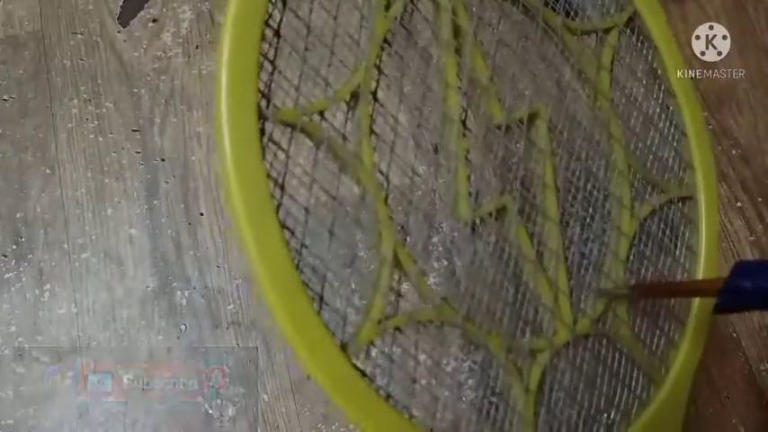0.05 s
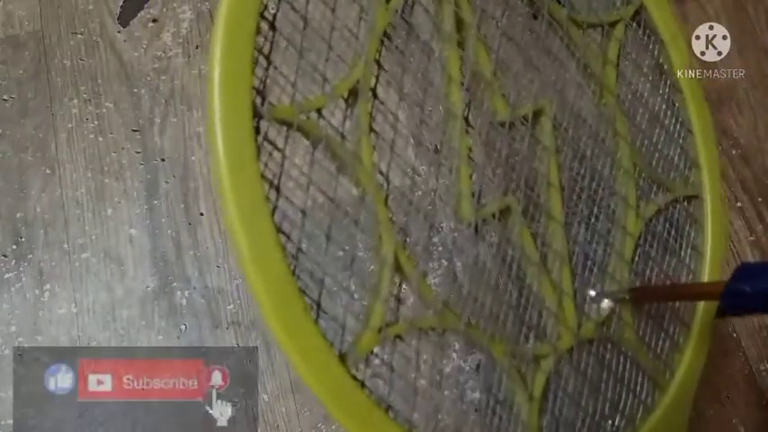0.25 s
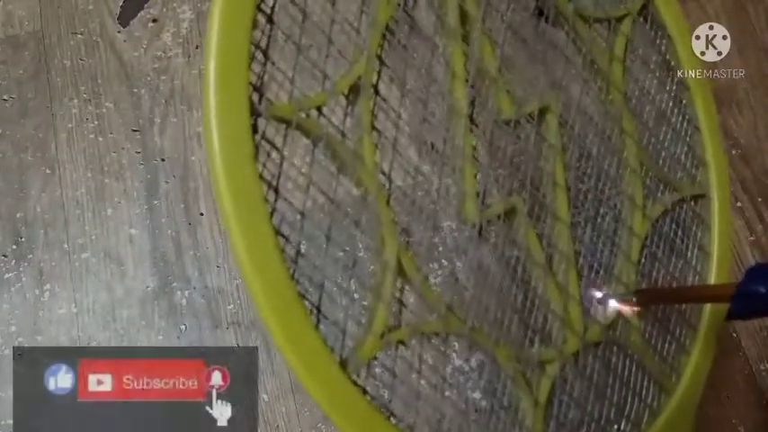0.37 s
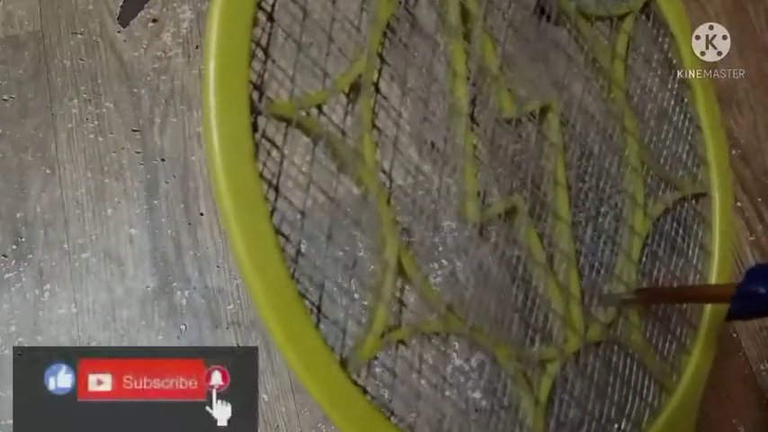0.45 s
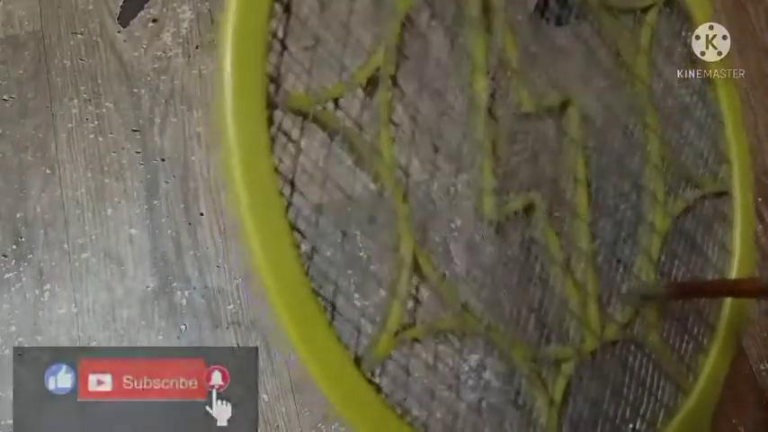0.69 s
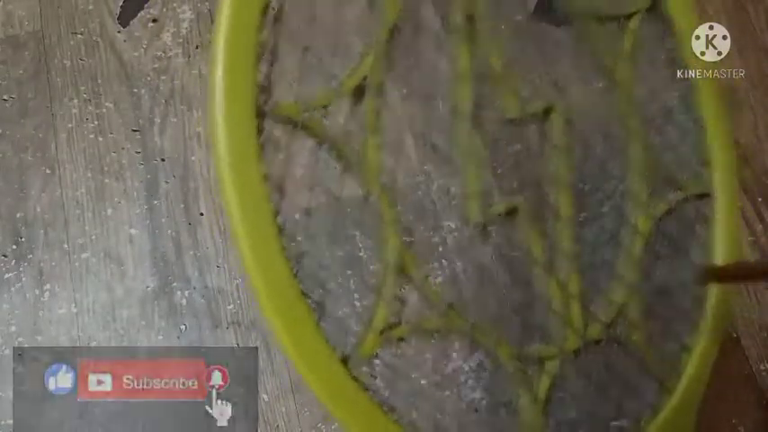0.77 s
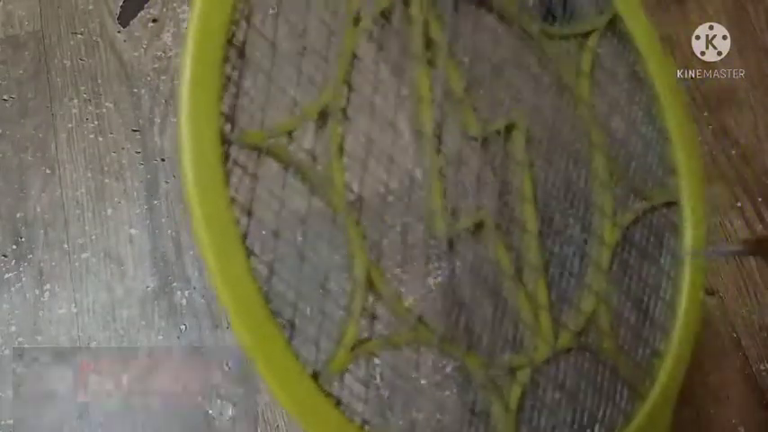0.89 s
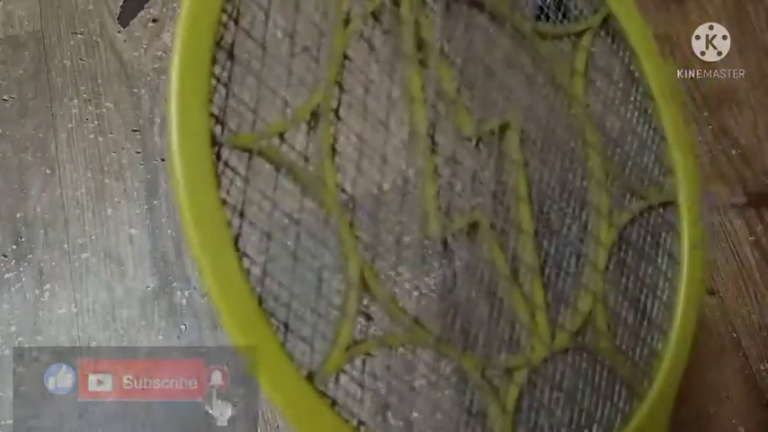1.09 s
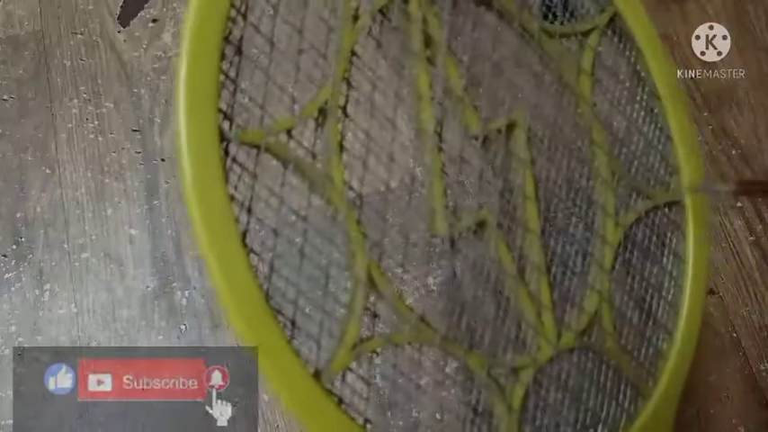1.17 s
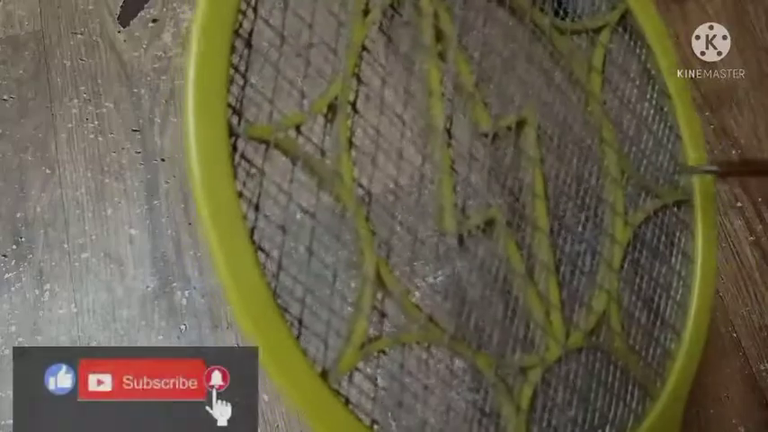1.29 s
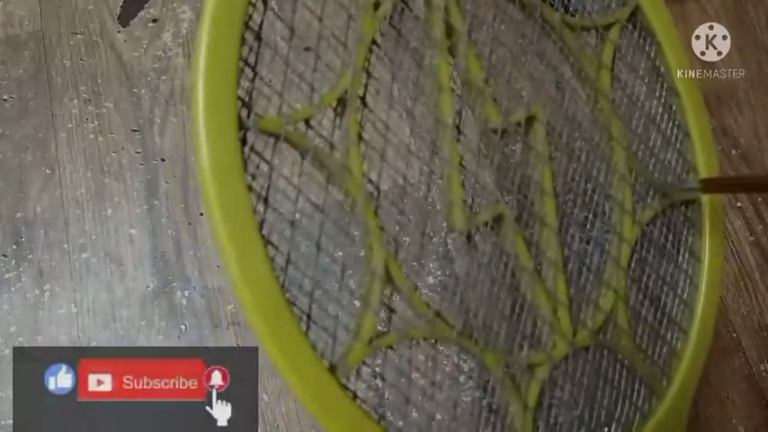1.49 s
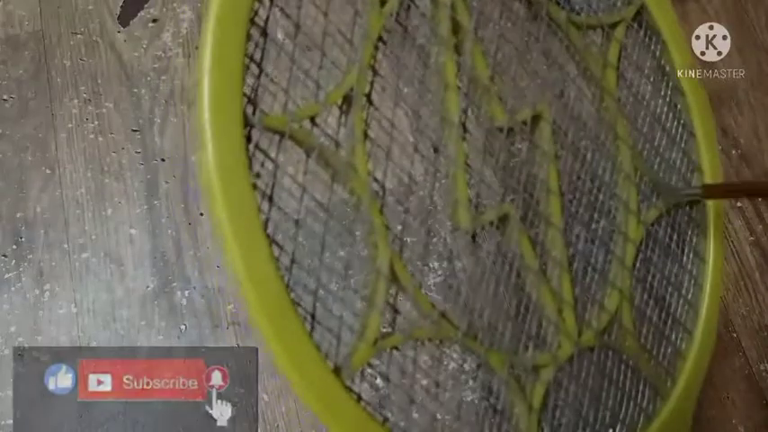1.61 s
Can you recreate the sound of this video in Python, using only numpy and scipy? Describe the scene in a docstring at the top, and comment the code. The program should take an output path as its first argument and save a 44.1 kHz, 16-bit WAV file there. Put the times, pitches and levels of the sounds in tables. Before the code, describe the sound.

A quick burst of sharp electric snaps from a fly swatter, then faint handling.

```python
"""Shorting an electric fly swatter

A table in a small room, a phone microphone close by, a faint low rumble underneath.
A metal tool scratches over the swatter's charged mesh and shorts it: a quick run of sparks snaps,
slowest where they are strongest. The tool is dragged off the wires, and the plastic frame
rattles and shifts once more on the table."""
import sys
import numpy as np
from scipy import signal
from scipy.fft import rfft, irfft
from scipy.io import wavfile

SR = 44100
rng = np.random.default_rng(int(sys.argv[2]) if len(sys.argv) > 2 else 0)


def generate_wav(signal):
    """Clip the signal to [-1, 1] and save it as 16-bit WAV at the path in sys.argv[1]."""
    frames = np.transpose(np.atleast_2d(signal))
    scaled = np.clip(frames, -1, 1) * 32767
    pcm = np.round(scaled).astype(np.int16)
    wavfile.write(sys.argv[1], SR, pcm)


N = 72765
TIME = np.arange(N) / SR
LN_1000 = np.log(1000)  # a 60 dB decay

def undb(db):
    return 10 ** (np.asarray(db) / 20)

def unit_rms(x):
    return x / np.sqrt(np.mean(x ** 2))

def convolve(x, response):
    return signal.fftconvolve(x, response)[:N]

def impulses(table):
    """One impulse for each (s, dB) row."""
    return sum(undb(db) * signal.unit_impulse(N, int(start * SR)) for start, db in table)

def envelope(start, length, attack, release):
    """Linear attack, hold, exponential release."""
    age = TIME - start
    return np.clip(age / attack, 0, 1) * np.exp(-np.maximum(age - length, 0) / release)

def colour(x, points, size=4096):
    """Minimum-phase filter through (Hz, dB) points."""
    hz, db = np.array(points).T
    bins_hz = np.maximum(np.fft.rfftfreq(size, 1 / SR), 1)
    gain = undb(np.interp(np.log(bins_hz), np.log(hz), db))
    cepstrum = irfft(np.log(gain))
    cepstrum[1:size // 2] *= 2
    cepstrum[size // 2 + 1:] = 0
    return convolve(x, irfft(np.exp(rfft(cepstrum))))

def damped_sine(hz, width_hz):
    return np.exp(-np.pi * width_hz * TIME) * np.sin(2 * np.pi * hz * TIME)

def resonate(x, modes):
    """Sum of resonances (Hz, width Hz, dB) with alternating signs."""
    response = sum((-1) ** k * undb(db) * width * damped_sine(hz, width)
                   for k, (hz, width, db) in enumerate(modes))
    return convolve(x, response)

def friction(contacts, modes, surface, release_s, slips_per_s=3000):
    """Uneven stick-slip clicks ring a body; each contact adds its own share of surface grit."""
    slips = (rng.random(N) < slips_per_s / SR) * rng.choice([-1, 1], N)
    slips = slips * (.5 + rng.random(N))
    push = np.array([undb(db) * envelope(start, length, attack, release_s)
                     for start, length, db, _, attack in contacts])
    grit_share = undb(np.array(contacts)[:, 3:4])
    body = np.linalg.norm(push, axis=0) * unit_rms(resonate(slips, modes))
    grit = np.linalg.norm(push * grit_share, axis=0) * unit_rms(colour(slips, surface))
    return body, grit

def room(x, t60_s=0.22, treble_t60_s=0.16, build_s=0.012, split_hz=5000):
    """Diffuse tail of a small room; the treble dies sooner."""
    tail = np.zeros(N)
    for band, t60 in (("low", t60_s), ("high", treble_t60_s)):
        crossover = signal.butter(2, split_hz, band, fs=SR, output="sos")
        tail += signal.sosfilt(crossover, rng.standard_normal(N)) * np.exp(-LN_1000 * TIME / t60)
    tail *= 1 - np.exp(-TIME / build_s)
    return convolve(x, tail / np.linalg.norm(tail))

# Room tone at the microphone. Each row: frequency in Hz, relative level in dB.
HISS_COLOUR = [(15, -55.5), (25, -25), (43, -27), (77, -8.5), (122, 0.5), (188, -10), (289, -11.5),
               (389, -14), (523, -15), (1020, -21.5), (1380, -18), (2490, -21.5), (3630, -24.5),
               (5880, -44.5), (9050, -35), (10900, -47.5), (15500, -44)]

def room_tone(hiss_db=-66.5, rumble_db=-79.5, rumble_hz=128, rumble_width_hz=47):
    """Faint hiss and a wavering low rumble."""
    hiss = colour(rng.standard_normal(N), HISS_COLOUR)
    rumble = resonate(rng.standard_normal(N), [(rumble_hz, rumble_width_hz, 0)])
    return undb(hiss_db) * unit_rms(hiss) + undb(rumble_db) * unit_rms(rumble)

# Strokes of the tool, close up. Each row: start and length in seconds, relative level in dB,
# grit share in dB, attack in seconds.
TOOL_STROKES = [(-.02, 0.031, -54, -5.5, 0.0045), (.024, 0.0042, -43.5, -6, 0.004),
                (.04, 0.052, -55, 1.5, 0.012), (.086, 0.0089, -48, -5, 0.0038),
                (.127, 0.021, -53.5, -1.5, 0.0035), (.328, 0.0077, -54, -16, 0.0016),
                (.453, 0.014, -48, 3, 0.0031), (.462, 0.042, -52.5, 0.5, 0.011),
                (.546, .028, -51.5, 3, 0.02), (.574, 0.038, -42.5, 3.5, 0.0029),
                (.616, 0.0074, -45, 6, 0.0018), (.63, 0.014, -55, 0, 0.0055)]
# Resonances of the mesh. Each row: frequency in Hz, width in Hz, gain in dB.
MESH_MODES = [(1586, 20, 1.5), (1602, 36, -3.5), (1798, 62, 6), (2110, 48, -3.5)]
# Grit of metal on wire. Each row: frequency in Hz, gain in dB.
GRIT_COLOUR = [(30, -53.5), (150, -17.5), (500, -29.5), (1250, -9.5), (1800, -5.5), (3000, 0.5),
               (4100, -2.5), (5500, -14), (7200, -17.5), (8700, -6.5), (10500, -22), (12300, -24),
               (15000, -16.5)]
# The tip catching a wire. Each row: start in seconds, relative level in dB.
WIRE_PLUCKS = [(.025, -47.5), (.129, -47), (.4525, -52), (.575, -42), (.617, -38.5)]

def tool_on_mesh(mesh_db=1.5, grit_db=-1, pluck_attack_s=.001):
    """The tool scratches and plucks the wires; both ring the same mesh resonances."""
    mesh, grit = friction(TOOL_STROKES, MESH_MODES, GRIT_COLOUR, release_s=0.012)
    ping = sum(undb(db) * damped_sine(hz, width) for hz, width, db in MESH_MODES)
    ping *= 1 - np.exp(-TIME / pluck_attack_s)
    return undb(mesh_db) * mesh + undb(grit_db) * grit + convolve(impulses(WIRE_PLUCKS), ping)

# The frame moving on the table. Each row: start and length in seconds, level in dB,
# rub share in dB, attack in seconds.
FRAME_SHIFTS = [(-.01, 0.067, -60, -10, 0.014), (.585, 0.013, -52, -7.5, 0.011),
                (.65, 0.051, -54.5, -2, 0.014), (.9, 0.014, -71.5, 0, 0.012),
                (.982, 0.052, -58.5, 2.5, 0.019), (1.055, 0.015, -67, 8.5, .022)]
# Resonances of the frame. Each row: frequency in Hz, width in Hz, gain in dB.
FRAME_MODES = [(300, 57, -5), (412, 38, -3.5), (611.5, 32, -4.5), (693, 59, -1.5), (796, 110, -3.5),
               (948, 41, -3.5), (1202, 30, -4.5), (2260, 180, -17.5)]
# Plastic rubbing on wood. Each row: frequency in Hz, gain in dB.
RUB_COLOUR = [(30, -35), (130, -12), (250, -4.5), (450, 6.5), (950, -6), (1400, 3.5), (2400, 5.5),
              (4300, -3), (5500, -12.5), (7500, -15), (8700, -3), (10500, -17.5), (15000, -18)]

def frame_on_table():
    """The plastic frame sticks and slips on the wood, rattling as it shifts."""
    rattle, rub = friction(FRAME_SHIFTS, FRAME_MODES, RUB_COLOUR, release_s=0.055)
    return rattle + rub

# Thin tones left as the swatter moves. Each row: start in seconds, frequency in Hz, level in dB,
# 60 dB decay time in seconds.
SWATTER_TONES = [(0.013, 715.4, -50, 0.067), (.6, 727, -50.5, .4), (.63, 3480, -57, 0.74),
                 (.61, 3640, -60, .33), (0.629, 7150, -66, 0.38), (.63, 8520, -77, 0.45),
                 (1.0, 3300, -55.5, 0.47), (0.999, 2348, -57, 0.42), (1.0, 4370, -64.5, .35),
                 (1.0, 6140, -72.5, 0.48), (1.0, 8460, -63.5, .35)]

def swatter_ringing(attack_s=0.031, width_hz=30.4):
    """Lightly damped tones of wires and frame swell and fade, their phase drifting a little."""
    tones = np.zeros(N)
    for start, hz, db, t60 in SWATTER_TONES:
        drift = np.cumsum(rng.standard_normal(N)) * np.sqrt(2 * np.pi * width_hz / SR)
        swell = envelope(start, attack_s, attack_s, t60 / LN_1000)
        tones += undb(db) * swell * np.sin(2 * np.pi * hz * TIME + drift)
    return tones

# The arc between the sparks. Each row: start and length in seconds, relative level in dB.
ARC_SPANS = [(0.166, 0.034, -51), (0.214, 0.085, -51)]

def arc_sizzle(pulses_per_s=820):
    """Tiny discharges at random moments make a fine sizzle."""
    strength = sum(undb(db) * envelope(start, length, attack=0.047, release=0.036)
                   for start, length, db in ARC_SPANS)
    pulses = (rng.random(N) < pulses_per_s / SR) * rng.random(N)
    return strength * unit_rms(pulses)

# Sparks, close to the microphone. Each row: start in seconds, relative level in dB.
DISCHARGES = [(0.177, -28.5), (0.1792, -22), (.208, -36), (0.2094, -47), (.214, -26), (0.2186, -18),
              (0.2245, -13.5), (.2312, -8.5), (0.2384, -7.5), (0.2458, -5), (0.253, -11), (0.2586, -10),
              (0.2641, -5), (.269, -17.5), (0.2728, -19.5), (0.2761, -17.5), (0.28, -18), (0.2833, -20),
              (0.2896, -35.5), (0.2922, -19), (.299, -25.5), (0.312, -21), (0.3153, -31), (0.3178, -14),
              (0.3208, -13.5), (0.3258, -23)]
# The microphone's high resonance. Each row: frequency in Hz, gain in dB, 60 dB decay time in seconds.
MIC_MODES = [(8560, -12.5, 0.0085), (8970, -14, 0.0079), (14600, -23, 0.0044)]
# One snap at close range. Each row: frequency in Hz, gain in dB.
SNAP_COLOUR = [(40, -23.5), (130, -1), (350, -1.5), (800, 0), (1300, -1), (2400, 4), (3600, 4.5),
               (5500, -6.5), (7500, -4.5), (10000, -7.5), (12300, -4.5), (15000, -0.5)]
# The snaps coming back off the walls. Each row: frequency in Hz, gain in dB.
SPARK_TAIL_COLOUR = [(150, -10), (900, -13.5), (2300, -9), (5000, -5.5), (8700, 0), (12000, -2.5),
                     (15000, 5.5)]

def sparks(gain_db=0.5, scatter_db=-6, scatter_s=.0025, room_db=-4):
    """Each discharge snaps and briefly sets the microphone's high resonance ringing."""
    pulses = -arc_sizzle() - undb(gain_db) * impulses(DISCHARGES)
    mic_ring = sum(undb(db) * np.exp(-LN_1000 * TIME / t60) * np.cos(2 * np.pi * hz * TIME)
                   for hz, db, t60 in MIC_MODES)
    snaps = colour(pulses + convolve(pulses, mic_ring), SNAP_COLOUR)
    scatter = rng.standard_normal(N) * np.exp(-TIME / scatter_s)  # off swatter and table
    scatter *= 1 - np.exp(-TIME / (scatter_s / 10))
    early = convolve(snaps, scatter / np.linalg.norm(scatter))
    tail = colour(room(snaps), SPARK_TAIL_COLOUR)
    return snaps + undb(scatter_db) * early + undb(room_db) * tail

# A hand bumping the table. Each row: start in seconds, level in dB.
HAND_BUMPS = [(0.388, -60.5), (0.554, -52.5), (0.682, -55), (0.94, -55), (1.02, -49), (1.257, -63),
              (1.321, -58.5)]

def table_bumps(hz=115.8, attack_s=0.0073, decay_s=0.018):
    """Soft pushes set the table top thudding."""
    thuds = np.zeros(N)
    for start, db in HAND_BUMPS:
        swell = envelope(start, attack_s, attack_s, decay_s)
        thuds += undb(db) * swell * np.sin(2 * np.pi * hz * (TIME - start))
    return thuds

def scene(handling_room_db=-6.5):
    """Everything at the one microphone beside the swatter."""
    snaps = sparks()
    handling = tool_on_mesh() + frame_on_table()
    handling += undb(handling_room_db) * room(handling)
    return (snaps + handling + swatter_ringing() + table_bumps() + room_tone())[None]

def record(dry, top_hz=15500):
    """The phone cuts the top steeply."""
    lowpass = signal.firwin(401, top_hz, fs=SR, window="blackman")
    return signal.fftconvolve(dry, lowpass[None], mode="same")

dry = scene()
out = record(dry)
generate_wav(out)
```